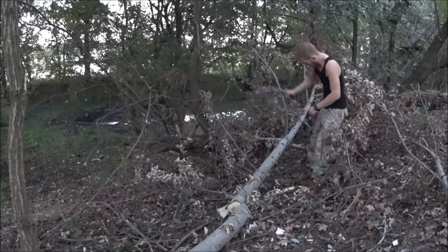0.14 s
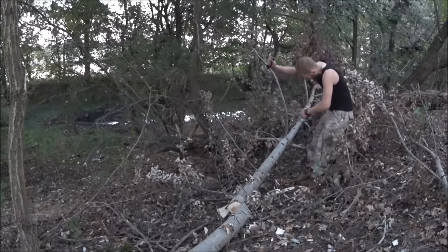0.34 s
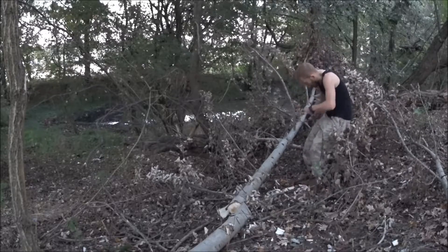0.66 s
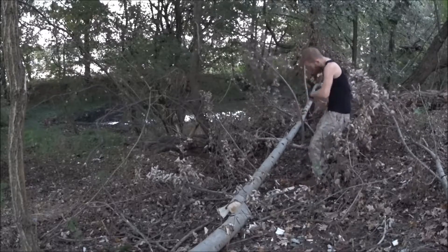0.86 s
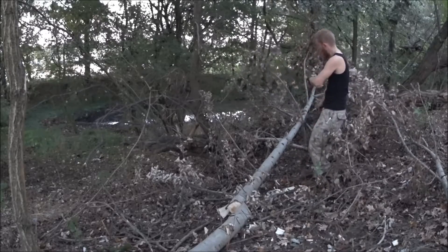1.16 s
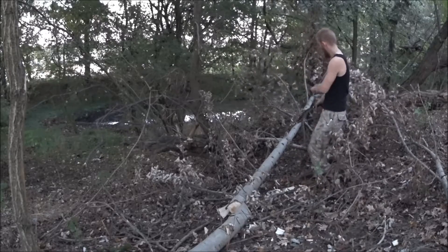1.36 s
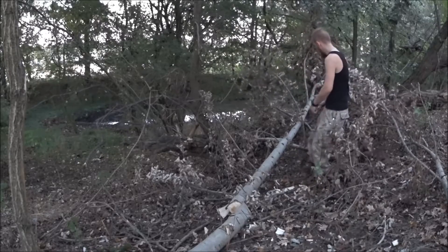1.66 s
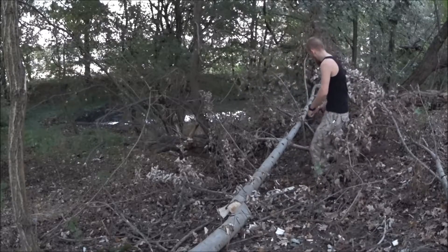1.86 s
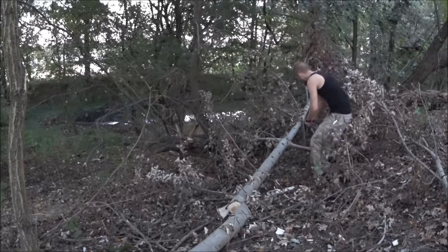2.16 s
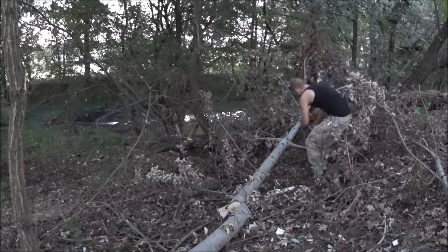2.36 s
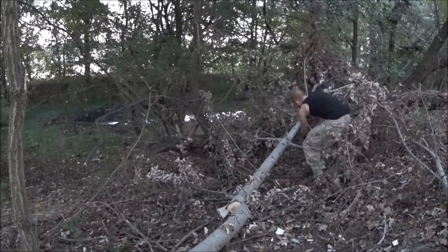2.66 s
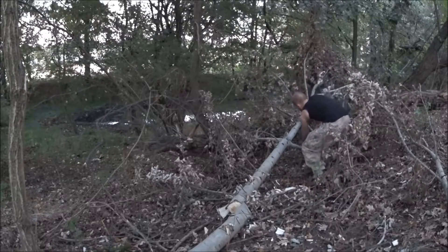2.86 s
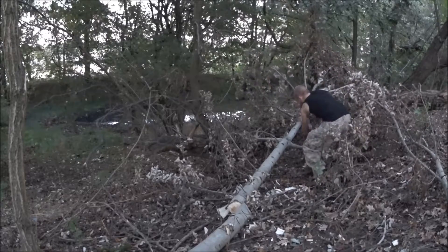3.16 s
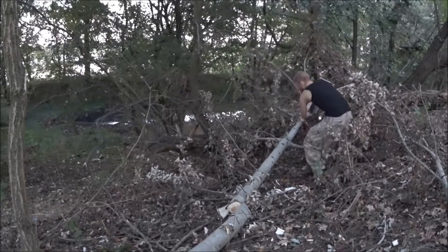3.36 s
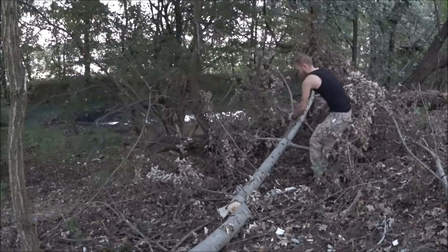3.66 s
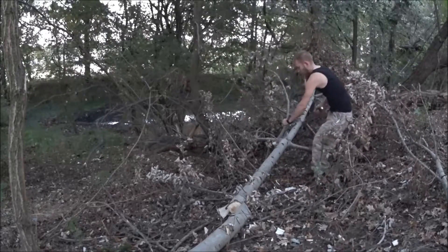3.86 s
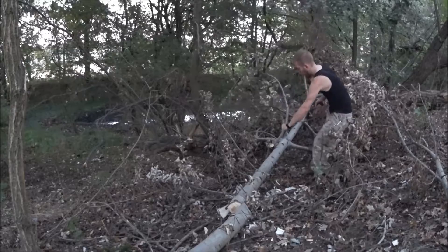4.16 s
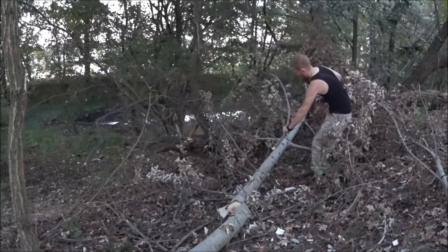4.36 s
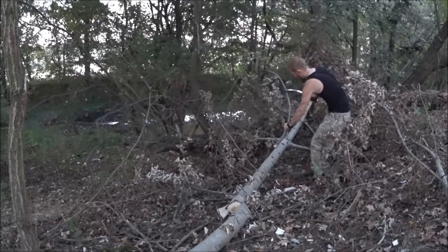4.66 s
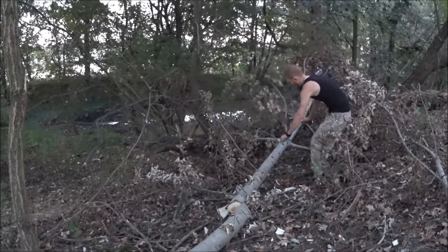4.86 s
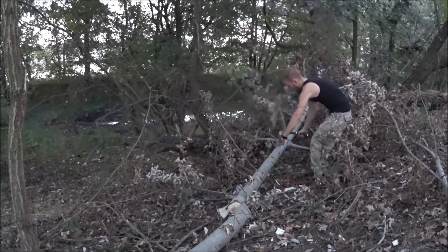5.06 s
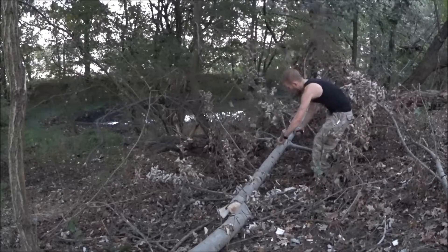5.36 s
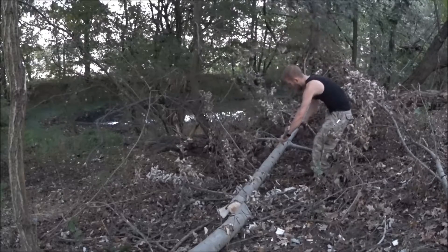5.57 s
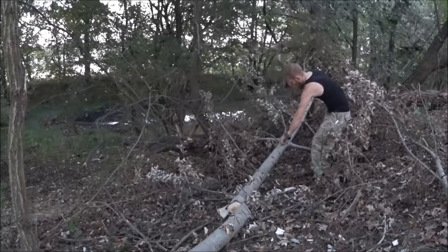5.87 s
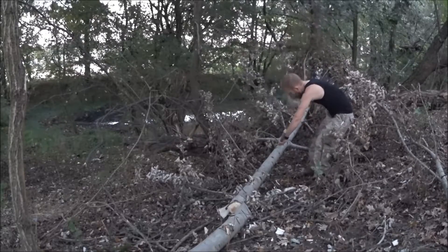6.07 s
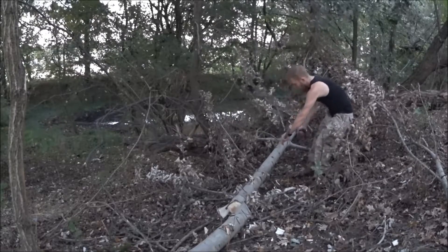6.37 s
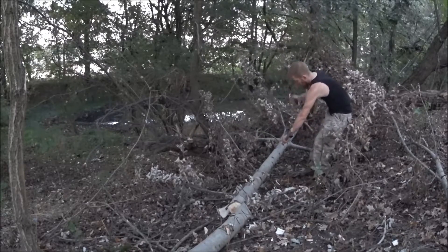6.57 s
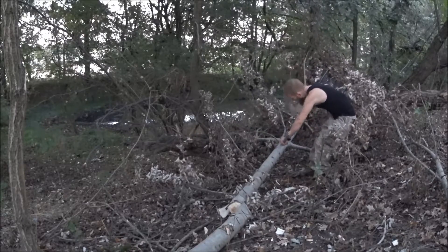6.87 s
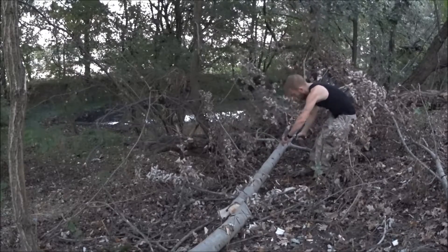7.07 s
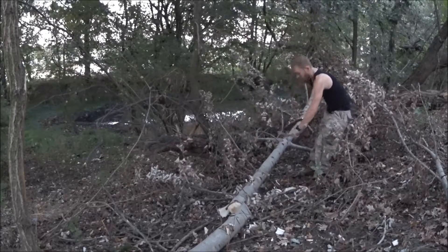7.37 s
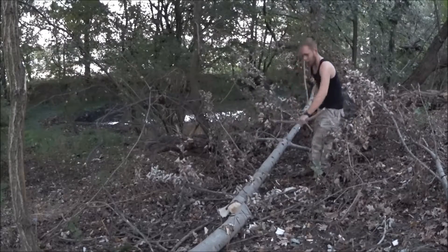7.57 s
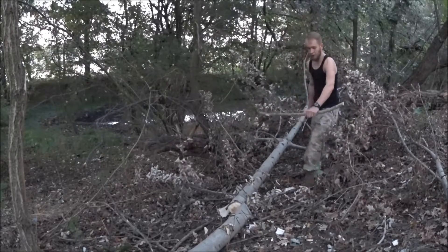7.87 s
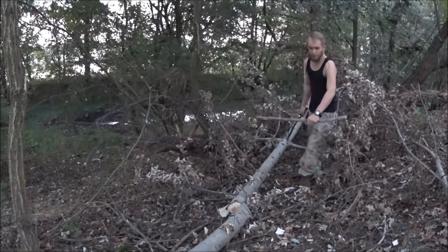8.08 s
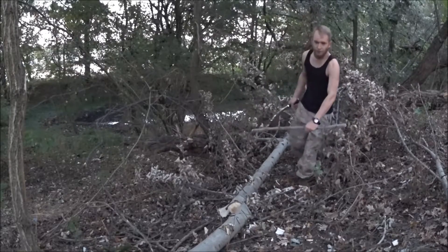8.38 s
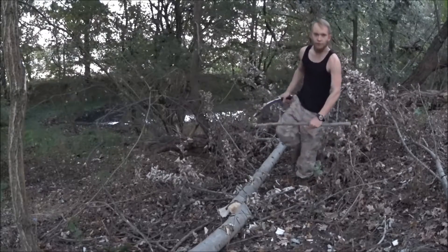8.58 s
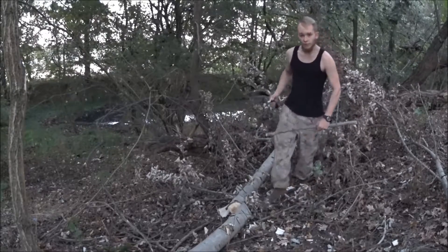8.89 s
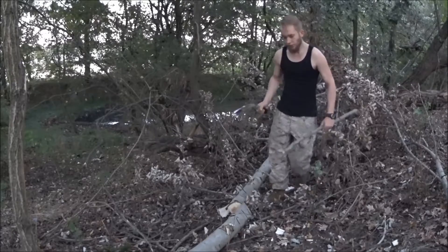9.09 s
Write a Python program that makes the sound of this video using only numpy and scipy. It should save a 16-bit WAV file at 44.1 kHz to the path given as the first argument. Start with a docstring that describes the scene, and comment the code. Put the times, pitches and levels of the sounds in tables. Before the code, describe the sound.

A few metres away in the woods, dead branches are bent and pulled from a felled trunk. Crisp leaves rustle and twigs tick and snap in uneven bursts, busiest in the first few seconds. Hard woody cracks land near 4.7, 6.2 and 7 seconds, the middle one loudest, each followed by thrashing foliage. Later it is quieter, with small snaps and steps in the litter. Faint outdoor hum, short echoes off trunks, stereo microphones with the work slightly to the right.

```python
"""Someone wrenches dead branches off a felled trunk in a brush pile in the woods, a few metres away.
Throughout: faint outdoor hum (coloured noise); feet shift in the litter (dull crackle).
From 0 s: foliage thrashes as branches let go; bending drives leaf crackle, twig ticks and stem scrape.
From 0.22 s: twigs snap (torn-fibre clicks with short rings). From 0.62 s: thick wood knocks (damped modes).
Echoes off trunks and ground surround it all; gain control flattens the loudest bursts."""
import sys
import numpy as np
from scipy import signal
from scipy.fft import rfft, irfft, next_fast_len
from scipy.io import wavfile
from scipy.ndimage import uniform_filter1d

SR = 44100
rng = np.random.default_rng(int(sys.argv[2]) if len(sys.argv) > 2 else 0)


def file_out(sig):
    """Save sig as 16-bit WAV at sys.argv[1]."""
    # one column per channel
    cols = np.atleast_2d(sig).T
    # limit, then scale
    lim = np.clip(cols, -1, 1)
    pcm = np.round(lim * 32767).astype(np.int16)
    wavfile.write(sys.argv[1], SR, pcm)


N = 407043


def gain_of(db):
    """Decibels to amplitude."""
    return 10 ** (np.asarray(db) / 20)


def evened(x):
    """Scales to an rms of 1."""
    return x / np.sqrt(np.mean(x ** 2) + 1e-20)


def read(points, hz):
    """Interpolates a table on a log-frequency axis."""
    f, value = np.transpose(points)
    return np.interp(np.log(hz + 1), np.log(f + 1), value)


def add(mix, s, sound):
    """Mixes a sound in at time s."""
    part = mix[max(round(s * SR), 0):][:len(sound)]
    part += sound[:len(part)]


def filtered(x, response):
    """Applies a frequency response given as a function of Hz."""
    size = next_fast_len(N + SR // 2, True)
    spectrum = rfft(x, size) * response(np.fft.rfftfreq(size, 1 / SR))
    return irfft(spectrum, size)[..., :N]


def coloured(x, spectrum):
    """Gives a white sound a spectrum, at an rms of 1."""
    return evened(filtered(x, lambda hz: gain_of(read(spectrum, hz))))


def banded(x, low_hz, high_hz):
    """Band-pass: 4th-order high-pass, then 2nd-order low-pass."""
    x = signal.sosfilt(signal.butter(4, low_hz, "high", fs=SR, output="sos"), x)
    return signal.sosfilt(signal.butter(2, high_hz, fs=SR, output="sos"), x)


def clicks(per_s, spread_db):
    """Clicks at random times, of random sign, with heights spread exponentially in dB."""
    at, size, chance = rng.random((3, 7000))
    height = gain_of(spread_db * np.minimum(-np.log(1 - size), 4)) * rng.choice([-1, 1], len(at))
    kept = chance < per_s * N / SR / len(at)
    return np.bincount((at * N).astype(int), height * kept, N)


def crackle(per_s, spread_db, ring_s, count=5):
    """Tiny fractures: each kind is a brief burst with a colour of its own."""
    t = np.arange(512) / SR
    bursts = rng.standard_normal((count, len(t))) * np.exp(-t / ring_s)
    shapes = rfft(bursts)
    bursts = irfft(shapes / np.sqrt(np.mean(abs(shapes) ** 2, 0)))  # together they are white
    return evened(sum(signal.oaconvolve(clicks(per_s / count, spread_db), b)[:N] for b in bursts))


def efforts(rows, skew=0.89, roundness=0.79):
    """Each effort swells and eases in one early-peaked, flat-topped arch; overlaps add in power."""
    t, power = np.arange(N) / SR, np.zeros(N)
    for start, length, db in rows:
        u = t[t < length] / length
        arch = abs(np.sin(np.pi * u ** skew)) ** roundness
        add(power, start, (gain_of(db) * arch) ** 2)
    return np.sqrt(power)


def air(level_db=-48, apart_db=-7):
    """Steady far-off outdoor hum: coloured noise, mostly shared by both microphones."""
    # hum spectrum: f/Hz, relative level/dB
    hum_spectrum = [(20, -11), (35, -2), (58, 5.5), (75, 2), (130, -4), (300, 0), (550, 1), (1050, 0),
                    (1600, -1.5), (3000, -19), (11000, -11)]
    shared, left, right = coloured(rng.standard_normal((3, N)), hum_spectrum)
    return gain_of(level_db) * (shared + gain_of(apart_db) * np.array([left, right]))


def feet(level_db=-2):
    """Shifting weight crushes litter: dull crackle scaled by load."""
    # feet shuffling on soft ground between treads: t/s, relative level/dB
    shuffle_points = [(0, -44), (3.4, -45), (5.0, -49), (6.6, -48), (9.23, -42)]
    # weight coming down on the litter: start/s, length/s, relative level/dB
    treads = [(0.59, 0.24, -35.5), (0.76, 0.48, -42), (1.6, 0.54, -46.5), (2.22, 0.26, -43),
              (2.6, 0.12, -41), (4.36, 0.23, -51), (6.16, 0.4, -43.5), (6.95, 0.18, -34), (8.8, 0.15, -42),
              (9.02, 0.34, -61)]
    # litter spectrum: f/Hz, relative level/dB
    ground_spectrum = [(30, -16), (80, -1.5), (130, -2.5), (210, -2), (420, -0.5), (650, -1.5), (1200, -4),
                       (4000, -41)]
    shuffle = gain_of(np.interp(np.arange(N) / SR, *np.transpose(shuffle_points)))
    weight = gain_of(level_db) * np.hypot(shuffle, efforts(treads))
    return weight * coloured(crackle(per_s=680, spread_db=0.5, ring_s=0.0016), ground_spectrum)


def thrashing(whip_s=0.0037):
    """A freed branch whips up to full speed in whip_s, thrashes for a while, and dies away."""
    # branches letting go or springing back: t/s, drive/dB, held/s, t60/s
    releases = [(0.0, -27, 0.017, 0.47), (0.601, -15.5, 0.065, 1.05), (1.015, -21, 0.081, 1.7),
                (2.628, -23.5, 0.027, 0.47), (3.485, -25.5, 0.058, 1.2), (4.743, -16, 0.41, 0.93),
                (6.171, -14, 0.065, 0.7), (6.954, -14, 0.071, 0.57), (8.794, -23.5, 0.096, 0.36)]
    t, power = np.arange(3 * SR) / SR, np.zeros(N)
    for at, db, held, t60 in releases:
        decay_db = -60 * np.maximum(t - held, 0) / t60
        speed = np.minimum(t / whip_s, 1) * gain_of(db + decay_db)
        add(power, at, speed ** 2)
    return np.sqrt(power)


def slips(per_s, spread_db, decay_s, steady):
    """Stems catch and slip: each slip starts a flurry at once, which then dies away."""
    kicks = clicks(per_s, spread_db) ** 2
    power = signal.lfilter([1], [1, -np.exp(-1 / (decay_s * SR))], kicks)
    return evened(np.sqrt(steady + power / power.mean()))


def twig_ticks(per_s, spread_db, cycles, low_hz, high_hz, count=12):
    """Thin twigs flick each other; each rings for a few cycles."""
    t = np.arange(1024) / SR
    pitches = np.geomspace(low_hz, high_hz, count) * rng.uniform(1.0, 1.04, count)
    rings = [np.sin(2 * np.pi * hz * t) * np.exp(-t * hz / cycles) for hz in pitches]
    return evened(sum(signal.oaconvolve(clicks(per_s / count, spread_db), r)[:N] for r in rings))


def brush():
    """Bending and thrashing drive flurries of leaf crackle, twig ticks and the duller scrape of stems."""
    # pulls that bend a branch and drag its leaves through the pile: start/s, length/s, drive/dB
    pulls = [(0.36, .39, -31), (0.71, .47, -21), (1.32, 0.44, -30.5), (1.63, .46, -26), (1.88, 0.096, -24),
             (1.98, 0.36, -31.5), (2.24, .34, -31), (2.53, 0.4, -32), (2.93, 0.34, -32.5),
             (3.08, 0.24, -28), (3.26, 0.27, -32), (3.57, 0.61, -20), (3.97, .38, -19.5), (4.28, 0.34, -28),
             (4.57, .13, -28.5), (5.22, 0.38, -27), (5.54, 0.37, -32), (5.91, 0.37, -35), (6.33, 0.38, -36),
             (6.75, 0.16, -34), (7.1, 0.44, -32), (7.73, 0.13, -33), (7.81, 0.42, -40), (8.14, 0.33, -33),
             (8.41, 0.15, -35), (8.55, 0.7, -42), (8.83, 0.1, -20.5), (8.96, .05, -30.5), (9.01, 0.31, -31)]
    # leaf spectrum: f/Hz, relative level/dB
    leaf_spectrum = [(300, -52), (1000, -19), (2000, -8), (3000, -4), (4200, -1), (5500, -0.5),
                     (7000, -1.44), (8300, -0.5), (10000, -1.5), (11200, -5), (13000, -15)]
    # stem spectrum: f/Hz, relative level/dB
    stem_spectrum = [(60, -20), (200, -20), (400, -5), (700, 3), (1500, 3), (2500, -3), (4000, -26.5),
                     (9000, -38)]
    rest_db = -40  # leaves never lie quite still
    stir = np.sqrt(gain_of(rest_db) ** 2 + efforts(pulls) ** 2 + thrashing() ** 2)

    # stems stand out more in a gentle pull than in a hard one
    scrape_db, at_stir_db, slope_db_per_db = -44, -30, 0.7762
    scrape = gain_of(scrape_db) * (stir / gain_of(at_stir_db)) ** slope_db_per_db

    # the harder the pull, the more slips overlap and the more even the rustle
    crowding = 1 / (1 + (gain_of(-22.5) / stir) ** 2)
    flurries = slips(per_s=170, spread_db=2.1, decay_s=0.0073, steady=0.62) ** (1 - 0.83 * crowding)

    leaf_crackle = crackle(per_s=7000, spread_db=-1.0, ring_s=0.00038, count=18)
    leaves = coloured(leaf_crackle * flurries, leaf_spectrum)
    ticks = twig_ticks(per_s=900, spread_db=3.5, cycles=10.0, low_hz=2762, high_hz=10570)
    ticks = evened(ticks * flurries)
    stem_crackle = crackle(per_s=2500, spread_db=3.5, ring_s=0.00057)
    stems = coloured(stem_crackle * flurries, stem_spectrum)
    foliage = gain_of(0.5) * leaves + gain_of(-15.5) * ticks
    return foliage * stir + stems * scrape


def snaps():
    """Twig fibres crack, then tear in a quick fading run; each is a click plus a short ring of the twig."""
    # twigs snapping: t/s, rms level/dB, ring f/Hz, tear decay/s
    twig_breaks = [(0.2169, -35.5, 3000, 0.006), (0.5467, -25, 7000, 0.003), (0.6025, -21.5, 3900, 0.006),
                   (0.7412, -21, 4260, 0.006), (2.1201, -16.5, 4300, 0.002), (2.2009, -27, 4400, 0.005),
                   (2.6334, -22, 3300, 0.004), (2.646, -23, 4500, 0.006), (2.731, -25, 4200, 0.003),
                   (2.847, -32, 3200, 0.005), (2.8789, -33, 7900, 0.007), (2.9148, -25, 2400, 0.002),
                   (2.918, -24.5, 2860, 0.004), (2.9365, -31, 3000, 0.006), (3.0859, -25, 4300, 0.01),
                   (3.125, -30, 4000, 0.02), (3.3862, -22.5, 4800, 0.004), (3.491, -24.5, 2800, 0.006),
                   (3.5224, -23, 2930, 0.007), (3.6117, -23, 4470, 0.004), (4.078, -23, 2500, 0.016),
                   (4.128, -22, 2300, 0.006), (5.012, -21, 2230, 0.004), (5.03, -21, 2520, 0.003),
                   (5.5727, -21.5, 6050, 0.003), (5.9718, -27.5, 8500, 0.002), (6.7565, -32.5, 5430, 0.012),
                   (6.8134, -30, 8400, 0.004), (7.3285, -28, 2550, 0.003), (7.4804, -27.5, 2880, 0.006),
                   (7.9773, -31.5, 6000, 0.003), (8.0745, -29.5, 4950, 0.007), (8.086, -28, 7000, 0.002),
                   (8.1115, -24.5, 8000, 0.001), (8.5609, -24.5, 3500, 0.004), (8.566, -28, 4800, 0.018),
                   (8.7969, -19.5, 4200, 0.002)]
    out, t = np.zeros(N), np.arange(4096) / SR
    for s, db, hz, tear in twig_breaks:
        fibres = rng.standard_normal(len(t)) * (rng.random(len(t)) < 12000 / SR)  # 12000 per s
        fibres *= np.exp(-t / tear) + np.exp(-t / 0.0006)  # tearing run + initial crack
        ring = np.sin(2 * np.pi * hz * t) * np.exp(-t * hz / 1.5)  # decays over 1.5 cycles
        ringing = signal.fftconvolve(fibres, ring / np.linalg.norm(ring))[:len(t)]
        snap = banded(ringing - 1.7 * fibres, 1900, 11000)
        add(out, s, gain_of(db) * snap / np.std(snap[t < tear + 0.001]))
    return out


def knocks(splinter_db=13, splinter_s=0.0053):
    """A blow rings damped wood modes under a puff of splintering; where it lands sets the band excited."""
    # thick wood breaking or knocking: t/s, peak/dB, lowest f/Hz, highest f/Hz, ring-time factor
    blows = [(.618, -25, 70, 400, 1.3), (0.9991, -18, 340, 720, 0.64), (4.7397, -11, 395, 3500, 0.1),
             (4.7403, -24.5, 110, 240, .85), (6.1699, -5, 150, 1250, 1.2), (6.9504, -10.5, 520, 1610, 1.1),
             (6.953, -24, 131, 260, 2.1), (8.112, -22, 430, 1800, 0.31), (8.274, -33, 150, 600, 0.47),
             (8.677, -33, 110, 400, 0.63), (8.795, -30, 450, 2000, 0.61)]
    # modes of the felled trunk and its limbs: f/Hz, relative level/dB, t60/s at ring-time factor 1
    limb_modes = [(117, -18, 0.094), (206, -12.5, 0.103), (351, 3.5, 0.047), (470, -9, 0.096),
                  (534, 1, 0.063), (782, -4, 0.043), (915, 6, 0.013), (1200, 2.5, 0.019), (1280, -21, .025),
                  (1680, -11, 0.014), (2380, 8, 0.016)]
    out, t = np.zeros(N), np.arange(SR // 4) / SR
    for s, db, low_hz, high_hz, ring in blows:
        wood = np.zeros(len(t))
        for k, (hz, mode_db, t60) in enumerate(limb_modes):
            decay = gain_of(mode_db - 60 * t / (t60 * ring))
            wood += (-1) ** k * decay * np.sin(2 * np.pi * hz * t)
        splinters = rng.standard_normal(len(t)) * np.exp(-t / (splinter_s * ring))
        wood = banded(wood + gain_of(splinter_db) * splinters, low_hz, high_hz)
        add(out, s, gain_of(db) * wood / abs(wood).max())
    return out


def wander(per_s):
    """Slow random drift at an rms of 1, interpolated between per_s points a second."""
    points = rng.standard_normal(size=8000)
    return evened(np.interp(np.arange(N) * per_s / SR, np.arange(len(points)), points))


def echoes(x):
    """Sparse echoes off trunks and ground from one spot, different at each microphone."""
    # echo decay: f/Hz, t60/s
    echo_t60 = [(100, 0.058), (500, 0.14), (2500, 0.2), (10000, 0.1)]
    taps = rng.choice([-1., 1.], (2, SR // 3)) * (rng.random((2, SR // 3)) < 3000 / SR)  # 3000 per s
    hz, t, z = signal.stft(taps, SR, nperseg=256)
    decay = gain_of(-60 * t / read(echo_t60, hz)[:, None])
    tail = signal.istft(z * decay, SR, nperseg=256)[1]
    tail /= np.linalg.norm(tail, axis=1, keepdims=True)
    return signal.oaconvolve(x[None], tail, axes=1)[:, :N]


def woods(x, count=3):
    """Direct sound from the right, plus echoes that change as the noise moves between spots in the pile."""
    # scattering off trunks and ground: f/Hz, level/dB
    scatter_levels = [(100, -11.5), (400, -8), (1000, -4.5), (2500, -11.5), (5000, -7.5), (10000, -8)]
    # phase by which left leads right: f/Hz, phase/rad
    left_lead = [(50, 0.1), (250, -0.76), (700, -1.5), (1300, -1.63), (2000, -1.24), (3000, -0.78),
                 (4500, -0.3), (6500, -0.049), (11000, 0.073)]
    # level difference between microphones: f/Hz, L-R/dB
    left_tilt = [(100, 2), (300, 2), (600, 0), (1100, -2), (2300, -6.5), (4000, -6.5), (6000, -3.5),
                 (8000, -2), (11000, -0.8)]
    shares = np.array([wander(per_s=25) for _ in range(count)])
    shares /= np.sqrt((shares ** 2).sum(0))
    scattered = sum(echoes(x * share) for share in shares)
    scattered = filtered(scattered, lambda hz: gain_of(read(scatter_levels, hz)))
    side = np.array([[0.5], [-0.5]])  # left, right
    direct = filtered(x, lambda hz: np.exp(1j * side * read(left_lead, hz)))
    return filtered(direct + scattered, lambda hz: gain_of(side * read(left_tilt, hz)))


def scene():
    """The work at the brush pile, heard through the trees over the hum."""
    return air() + woods(feet() + brush() + snaps() + knocks())


def record(dry, threshold_db=-17, envelope_fall_db_per_s=9, strength=0.7, edge_hz=11120):
    """Gain control ducks quickly on loud bursts and recovers slowly; peaks round off; then a low-pass."""
    power_db = 10 * np.log10(abs(uniform_filter1d((dry ** 2).mean(0), size=500)) + 1e-12)
    fall_db = np.arange(N) * envelope_fall_db_per_s / SR
    envelope_db = np.maximum.accumulate(power_db + fall_db) - fall_db
    over_db = np.maximum(envelope_db - threshold_db, 0)
    ducked = dry / gain_of(strength * uniform_filter1d(over_db, size=100))
    rounded = ducked / (1 + (ducked / 0.7) ** 4) ** 0.25
    low_pass = signal.firwin(1023, edge_hz, window=("kaiser", 9), fs=SR)
    return signal.oaconvolve(rounded, low_pass[None], "same")


dry = scene()
out = record(dry)
file_out(out)
```